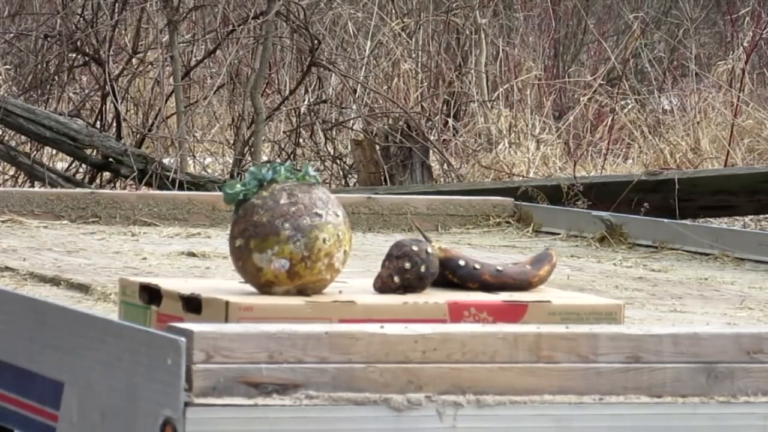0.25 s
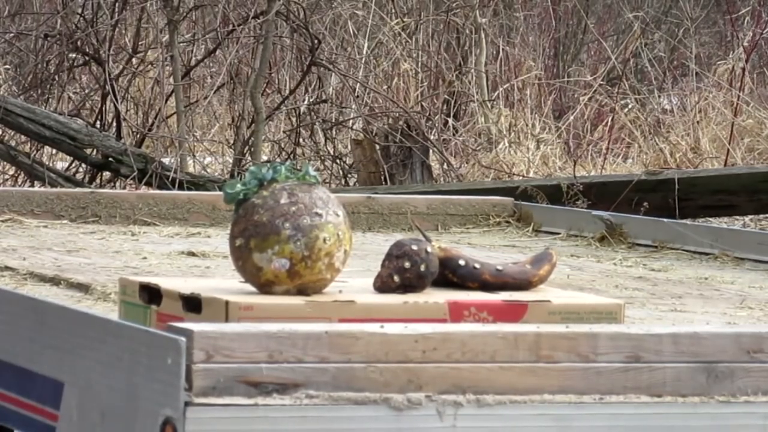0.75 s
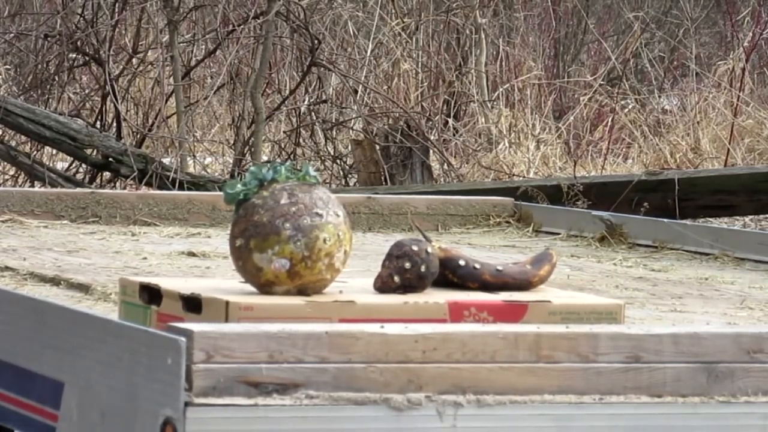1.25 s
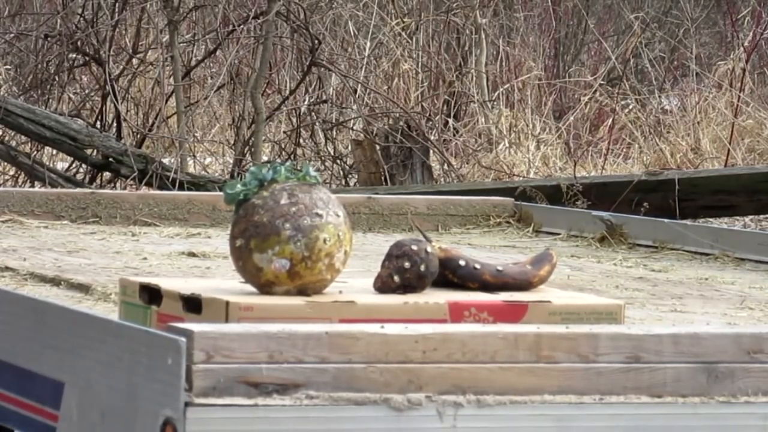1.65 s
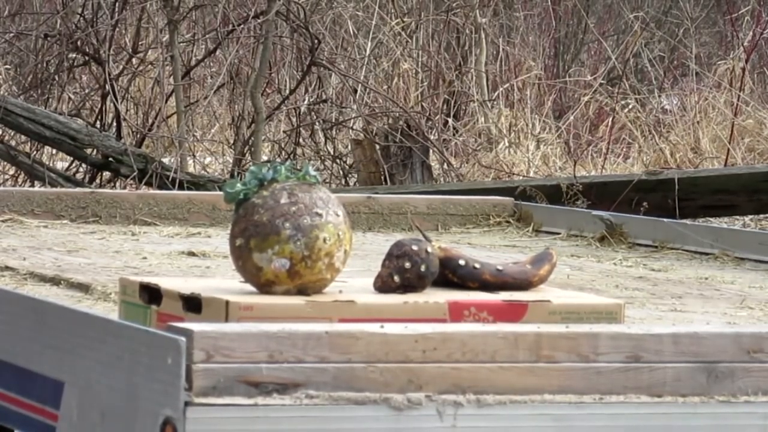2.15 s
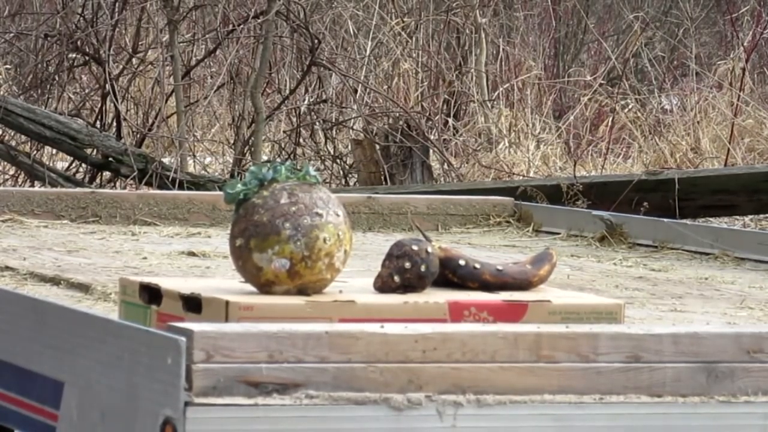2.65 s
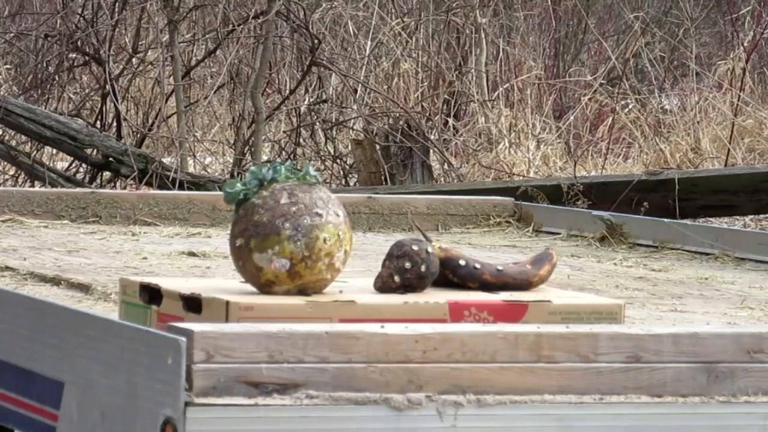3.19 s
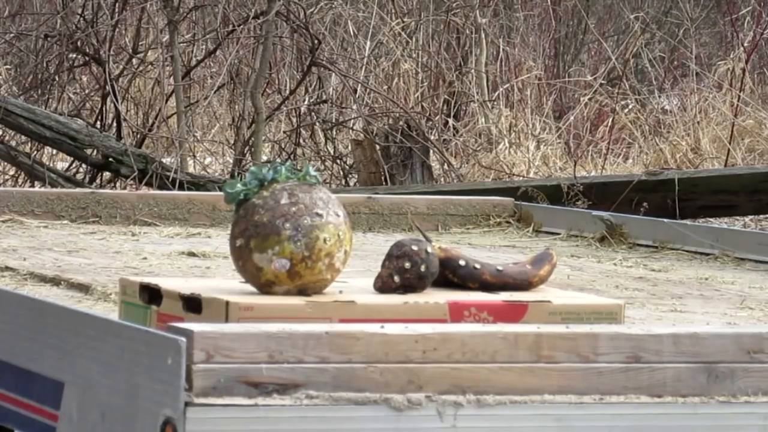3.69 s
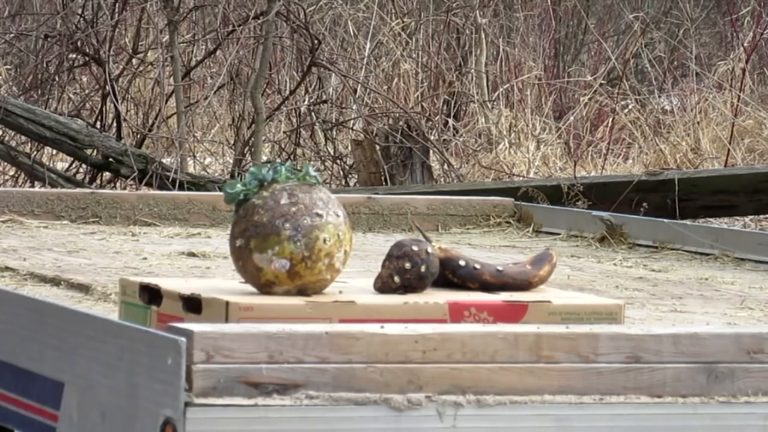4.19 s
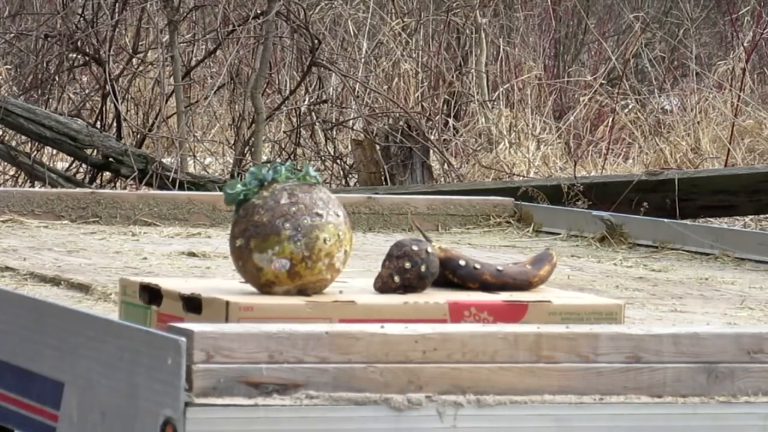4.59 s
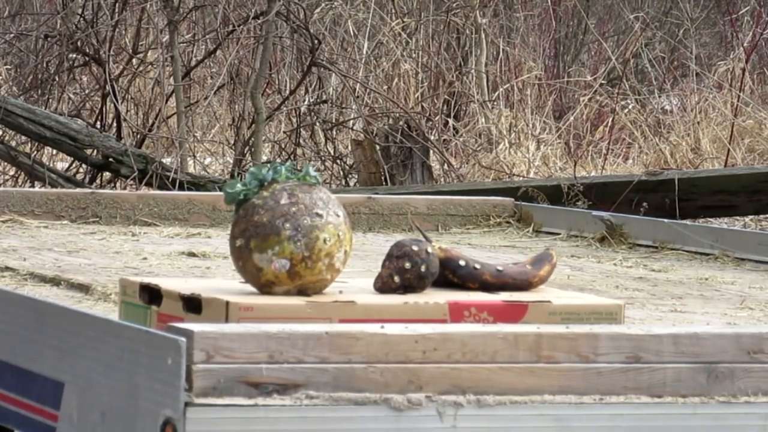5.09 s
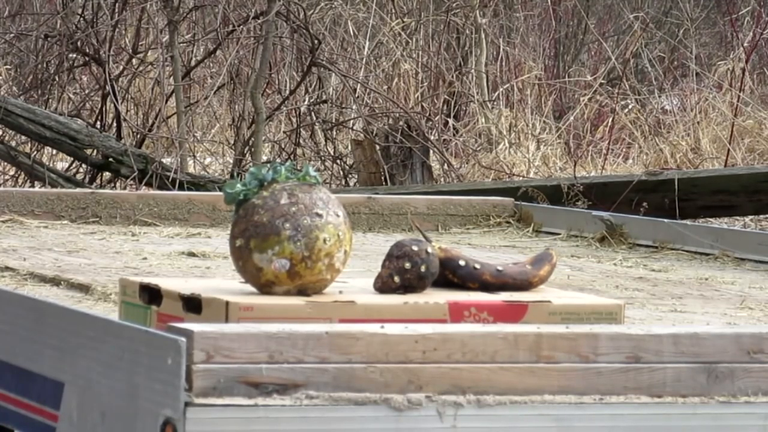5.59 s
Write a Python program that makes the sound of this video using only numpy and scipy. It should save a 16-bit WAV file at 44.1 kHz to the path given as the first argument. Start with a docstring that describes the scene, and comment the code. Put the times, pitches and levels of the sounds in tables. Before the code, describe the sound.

Wind thuds and rumbles on a microphone outdoors from the start, and an air pistol scrapes faintly in the hand. The first and loudest shot comes at about 0.3 seconds, a sharp crack with a puff of gas and a short reverberation from nearby trees. Two more follow at 1.5 and 2.4 seconds. Between them, gusts make low thumps, strongest around 1.1 and 2.3 seconds. From 3 seconds the pistol fires eight quicker, slightly quieter shots, evenly spaced a little under 0.4 seconds apart, the last at about 5.6 seconds. Every shot is followed by a faint dry tick of the pellet and, within a tenth of a second, the briefly ringing metallic snap of the action. The wind weakens during the quick run, leaving a soft, dull rush of open air.

```python
"""Gusts of wind thud on a microphone outdoors, as turbulent eddies carry swings of pressure past it.
An air pistol scrapes faintly in the hand, then fires eleven shots, three slowly and eight in quick
succession. Each is a push of expanding gas and a sharp crack, reflected by the ground, scattered by the
yard and trailed by reverberation from the edge of a wood. The pellet ticks downrange, then the action
snaps back and sets the gun's modes ringing."""
import sys
import numpy as np
from scipy import signal
from scipy.fft import rfft, irfft
from scipy.io import wavfile
from scipy.ndimage import uniform_filter1d

SR = 44100
rng = np.random.default_rng(int(sys.argv[2]) if len(sys.argv) > 2 else 0)


def waveform_to_disk(signal):
    """Save audio, clipped to [-1, 1], as 16-bit WAV at the path in sys.argv[1]."""
    frames = np.transpose(np.atleast_2d(signal))
    scaled = np.clip(frames, -1, 1) * 32767
    samples = np.round(scaled).astype(np.int16)
    wavfile.write(sys.argv[1], SR, samples)


N = 257749
T = np.arange(N) / SR
AGE = T[:SR // 2]  # seconds since the start of one short sound


def amp(db):
    """Amplitude grows tenfold for every 20 dB."""
    return 10 ** (np.asarray(db) / 20)


def unit(x):
    """Normalisation scales a signal to an energy of 1."""
    return x / np.sqrt(np.sum(x ** 2) + 1e-20)


def gains(spectrum, hz):
    """Interpolation on a log-frequency axis gives a spectrum's gain at any frequency."""
    points_hz, db = np.transpose(spectrum)
    return amp(np.interp(np.log(hz + 1), np.log(points_hz + 1), db))


def add(mix, start, sound):
    """Superposition: a sound adds to the mix from its start in seconds."""
    part = mix[max(round(start * SR), 0):][:len(sound)]
    part += sound[:len(part)]


def colour(x, spectrum, size=4096):
    """A minimum-phase filter shapes the spectrum and keeps attacks sharp; the result has energy 1."""
    log_gain = np.log(gains(spectrum, abs(np.fft.fftfreq(size, 1 / SR))))
    taps = np.fft.ifft(np.exp(signal.hilbert(log_gain).conj())).real
    return unit(signal.fftconvolve(x, taps[:size // 2])[:len(x)])


def decaying_noise(t60):
    """Exponential decay: noise of energy 1 falls by 60 dB in t60 seconds."""
    return unit(rng.standard_normal(len(AGE)) * amp(-60 * AGE / t60))


def burst(decay_s):
    """Repeated whitening and damping spread a brief turbulent burst evenly over all frequencies."""
    x = decaying_noise(decay_s)
    for _ in range(4):
        bins = rfft(x)
        x = irfft(bins / (abs(bins) + 1e-9), len(x)) * amp(-20 * AGE / decay_s)
    return unit(x)


def smooth(x, span):
    """Two moving averages suppress changes faster than span samples."""
    return uniform_filter1d(uniform_filter1d(x, span), span)


def steady_noise(spectrum, steady_s):
    """Division by its running rms holds coloured noise near rms 1 over spans longer than steady_s."""
    x = irfft(rfft(rng.standard_normal(N)) * gains(spectrum, np.fft.rfftfreq(N, 1 / SR)), N)
    return x / np.sqrt(abs(smooth(x ** 2, int(steady_s * SR))) + 1e-20)


def clumps(size, span_s, depth_db):
    """Random amplitude modulation: a gain that swells and sinks about once per span."""
    drift = smooth(rng.standard_normal(size), round(span_s * SR))
    return amp(depth_db * np.clip(drift / drift.std(), -2, 2))


# The level of the background air. Each row: time in seconds, relative level in dB.
BACKGROUND_LEVELS = [(0.0, -51.5), (0.19, -47), (0.39, -57.5), (1.4, -52), (1.69, -59.5), (2.42, -57.5),
                     (2.55, -60.5), (4.24, -68), (5.61, -64.5), (5.84, -63.5)]
def background_db():
    """A level envelope: it dips after each slow shot, swells back and stays low in the quick shots."""
    return np.interp(T, *np.transpose(BACKGROUND_LEVELS))


# Spectra of the far rush and the faint hiss. Each row: frequency in Hz, relative level in dB.
RUSH_SPECTRUM = [(40, 7.5), (400, 0), (800, 2.5), (1000, -1.5), (1350, -1.5), (2000, -12), (2600, -16.5),
                 (3300, -23), (5000, -25.5), (7500, -27.5), (11000, -32), (13000, -34), (15000, -44.5)]
HISS_SPECTRUM = [(1000, -2.5), (2800, 3.5), (4000, -2), (7200, 1.5), (9000, -5.5), (12000, -10.5),
                 (14000, -27.5)]
def open_air(rush_gain_db=6, hiss_db=-75):
    """Ambient noise: a far, dull rush dips and swells with the background level, over a steady hiss."""
    rush = amp(background_db() + rush_gain_db) * steady_noise(RUSH_SPECTRUM, steady_s=.3)
    return rush + amp(hiss_db) * steady_noise(HISS_SPECTRUM, steady_s=.3)


# Gusts at the microphone. Each row: peak time in seconds, length in seconds, relative rumble level
# in dB, relative flutter level in dB.
GUST_PEAKS = [(0.005, 0.14, -21.5, -18.5), (0.185, 0.08, -22.5, -39.5), (0.395, 0.062, -27, -28),
              (0.524, 0.1, -27.5, -36.5), (0.665, 0.1, -23, -31), (0.883, 0.16, -21, -37),
              (1.112, 0.16, -22.5, -19.5), (1.24, 0.13, -22.5, -27.5), (1.424, 0.082, -21, -40.5),
              (1.615, 0.052, -32.5, -27.5), (1.76, 0.13, -32, -29.5), (1.901, 0.088, -26.5, -24.5),
              (2.001, 0.14, -23.5, -29.5), (2.249, 0.14, -23.5, -26.5), (2.331, 0.094, -20, -16.5),
              (2.73, 0.043, -29.5, -44.5), (2.83, 0.026, -24.5, -42), (2.957, .09, -34, -42),
              (3.27, 0.11, -33, -32), (3.479, 0.049, -37.5, -39), (3.64, 0.14, -40.5, -52.5),
              (3.821, .06, -35.5, -37), (4.07, 0.086, -32, -37), (4.501, 0.091, -38.5, -42.5),
              (4.703, 0.055, -38, -38), (5.135, 0.077, -41.5, -47)]
def gust_levels(rumble_gain_db=11, flutter_gain_db=-4.5, edge_db=-10):
    """Incoherent sources add in power: background and gusts sum to rumble and flutter levels in dB."""
    background = amp(background_db()) * clumps(N, span_s=.045, depth_db=3.5)
    power = (amp([[rumble_gain_db], [flutter_gain_db]]) * background) ** 2
    for peak_s, length, rumble_db, flutter_db in GUST_PEAKS:
        near = abs(T - peak_s) < 2 * length
        shape_db = edge_db * (abs(T[near] - peak_s) / (length / 2)) ** 1.5
        power[:, near] += amp([rumble_db + shape_db, flutter_db + shape_db]) ** 2
    return 10 * np.log10(power)


# Spectra of the wind's three bands. Each row: frequency in Hz, relative level in dB.
RUMBLE_SPECTRUM = [(8, -16), (25, 0), (45, 1.5), (75, 2), (125, -2), (170, -8.5), (260, -30.5),
                   (1000, -77.5)]
FLUTTER_SPECTRUM = [(80, -21), (160, 5), (230, 1.5), (330, -14.5), (500, -24.5), (1000, -57), (3000, -74)]
ROAR_SPECTRUM = [(150, -21.5), (300, 9), (420, 7), (600, -5), (900, -15), (1500, -43.5), (4000, -76)]
def wind(rumble_db, flutter_db):
    """Turbulent pressure buffets the microphone in puffs; only hard gusts reach up into a roar."""
    puffs = clumps(N, span_s=.016, depth_db=3)
    rumble = amp(rumble_db - 2) * steady_noise(RUMBLE_SPECTRUM, steady_s=.077)
    flutter = amp(flutter_db - 4.5) * steady_noise(FLUTTER_SPECTRUM, steady_s=.016)
    roar_db = flutter_db - 10 + .86 * (flutter_db + 20)
    roar = amp(roar_db) * steady_noise(ROAR_SPECTRUM, steady_s=.039)
    return np.sqrt(puffs) * rumble + puffs * (flutter + roar)


def eddy_pulse(t, hz):
    """A vortex passing at t = 0 swings the pressure up, then down; its spectrum peaks at hz."""
    phase = 2 * np.pi * hz * t
    return -phase * np.exp((1 - phase ** 2) / 2)


def small_eddies(flutter_db, lowest_hz=150, octaves=.82, count=150):
    """The flow carries random eddies past, as strong as their gust; smaller ones are higher and weaker."""
    out = np.zeros(N)
    t = AGE[:SR // 25] - .02
    for when, smallness, strength in rng.random((count, 3)):
        hz = lowest_hz * 2 ** (octaves * smallness)
        peak = 2 * strength * amp(flutter_db[int(when * N)] + 3) * 2 ** -smallness
        add(out, when * N / SR + t[0], peak * eddy_pulse(t, hz))
    return out


# Single eddies at the microphone. Each row: time in seconds, relative peak in dB, frequency in Hz.
EDDY_THUDS = [(0.035, -9.5, 172), (.084, -9.5, 136), (0.184, -15, 121), (0.88, -16, 83.3),
              (1.051, -11.5, 231), (1.088, -7, 227), (1.109, -3.5, 116.8), (1.178, -11.5, 175),
              (1.305, -14, 150), (1.41, -25, 114), (2.037, -19, 157), (2.221, -10.5, 142.8),
              (2.315, -11, 264), (2.35, -9, 180), (2.836, -22, 196), (2.948, -22, 135), (3.28, -17.5, 150)]
def thuds():
    """Each eddy's pressure swing is a thud; strong, fast ones break into a short turbulent roar."""
    out = np.zeros(N)
    for centre_s, db, hz in EDDY_THUDS:
        add(out, centre_s - .02, amp(db - 1) * eddy_pulse(AGE - .02, hz))
        roughness = amp(13 + 1.6 * db) * (hz / 190) ** 2
        add(out, centre_s - .002, roughness * colour(decaying_noise(t60=.045), ROAR_SPECTRUM))
    return out


# Scrapes on the gun. Each row: peak time in seconds, level in dB, rise and fall constant in seconds.
HAND_SCRAPES = [(0.074, -27, 0.0011), (0.132, -15, 0.0086), (0.206, -24, 0.0027), (0.715, -22.5, 0.0038)]
# Their spectrum. Each row: frequency in Hz, relative level in dB.
SCRAPE_SPECTRUM = [(300, -13), (1800, 11.5), (3500, 2.5), (6000, -1), (9000, -22), (15000, -27.5)]
def handling(lead_s=.03):
    """Friction makes short, soft swells of noise as the gun is handled."""
    out = np.zeros(N)
    for peak_s, db, fade_s in HAND_SCRAPES:
        rub = rng.standard_normal(len(AGE)) * np.exp(-abs(AGE - lead_s) / fade_s)
        add(out, peak_s - lead_s, amp(db) * colour(rub, SCRAPE_SPECTRUM))
    return out


# The spectrum of the muzzle crack. Each row: frequency in Hz, relative level in dB.
CRACK_SPECTRUM = [(200, -28), (1000, -20.5), (1500, -7.5), (2000, 0.5), (2700, -9), (4200, -11), (5500, -6),
                  (6800, -1), (8000, -4.5), (11000, -2), (12500, -10.5), (14500, -22.5), (16000, -40.5)]
def shot_spectrum(tilt_db, bark_db, bark_hz=1950):
    """Spectral tilt brightens or dulls a crack; barrel resonance gives it more or less hollow bark."""
    hz, db = np.transpose(CRACK_SPECTRUM)
    octaves = np.log2(hz / bark_hz)
    return np.c_[hz, db + tilt_db * octaves + bark_db * np.exp(-(octaves / .5) ** 2)]


# The gun's modes of vibration. Each row: frequency in Hz, relative level in dB.
GUN_MODES = [(1700, -3.5), (2030, -2.5), (2840, 2), (3760, -7.5), (4750, -2), (5500, -13.5), (6215, 5.5),
             (6720, -6.5), (7050, -6.5), (7420, -6.5), (8390, -7.5), (8840, -7.5), (9130, -6.5),
             (10350, -9), (10620, -14), (10950, -9), (11850, -10)]
def gun_ring(t60=.041, spread_db=1.6):
    """Damped normal modes ring briefly, excited a little differently by every blow."""
    hz, db = np.transpose(GUN_MODES)[:, :, None]
    envelope_db = db + spread_db * rng.standard_normal(hz.shape) - 60 * (AGE / t60) ** 1.35
    modes = amp(envelope_db) * np.sin(2 * np.pi * (hz * AGE + rng.random(hz.shape)))
    return unit(modes.sum(0))


# The shots. Each row: start in seconds, push level in dB, crack level in dB, tilt in dB per octave,
# bark in dB.
PISTOL_SHOTS = [(0.256, 12.5, 14, 1, -3.5), (1.4861, 10, 11, -2.5, -8), (2.4485, 7.5, 8.5, -0.5, -5.5),
                (3.0052, 4, 8.5, 2, 3.5), (3.397, 3, 8.5, 1, -2), (3.7427, -1, 5, 1.5, -4.5),
                (4.1255, -1.5, 5, 3.5, 4.5), (4.5075, -1.5, 3.5, -2, -6), (4.878, -1.3, 3.5, 2.5, -1.5),
                (5.2629, -1.5, 3, 2, 2.5), (5.6457, -0.5, 4, 3, 9.5)]
# Spectra of the gas push and the scattered sound. Each row: frequency in Hz, relative level in dB.
PUSH_SPECTRUM = [(30, -23), (100, -1), (250, 2), (480, 4), (820, 1.5), (1020, -14.5), (1500, -19.5),
                 (4000, -18.5), (16000, -75)]
SCATTER_SPECTRUM = [(60, -5.5), (250, -5), (800, 4.5), (1250, 0.5), (2100, -4), (3400, -8), (5200, -1),
                    (7000, -3.5), (11000, 0), (13000, -5.5), (15000, -15.5)]
# Reflecting surfaces. Each row: delay in seconds, push gain in dB, crack gain in dB, nominal decay
# time of the smeared crack in seconds.
REFLECTORS = [(.0059, -23, -17.5, 0.0026), (.0092, -24.5, -26, 0.0051), (0.019, -34.5, -17.5, 0.026),
              (.023, -32.5, -17.5, 0.028), (.0345, -23, -40, .008), (.054, -31.5, -27, 0.028),
              (0.14, -60, -46.5, 0.11)]
def shots(crack_s=.00056, ground_s=.00356, near_s=.00232, scatter_s=.0037):
    """Gas expands from the muzzle with a push and a crack; reflection and scattering return both."""
    out = np.zeros(N)
    yard = decaying_noise(t60=.13)
    push = colour(signal.unit_impulse(len(AGE)), PUSH_SPECTRUM)
    smears = [colour(burst(decay_s), CRACK_SPECTRUM) for *_, decay_s in REFLECTORS]
    for start, push_db, crack_db, tilt_db, bark_db in PISTOL_SHOTS:
        spectrum = shot_spectrum(tilt_db, bark_db)
        direct = amp(push_db) * push
        add(direct, crack_s, amp(crack_db) * colour(burst(decay_s=.003), spectrum))
        add(out, start, direct)
        ground_echo = amp(-2.6 - .89 * crack_db) * direct
        add(out, start + ground_s, ground_echo)
        near_echo = amp(-8.5 + 1.45 * crack_db) * colour(burst(decay_s=.0006), spectrum)
        add(out, start + crack_s + near_s, near_echo)
        for (delay, push_gain_db, crack_gain_db, _), smear in zip(REFLECTORS, smears):
            echo = amp(push_db + push_gain_db) * push + amp(crack_db + crack_gain_db) * smear
            add(out, start + delay, echo)
        # small surfaces scatter the shot in uneven clumps, partly the same each time
        scatter = yard + decaying_noise(t60=.1) + decaying_noise(t60=.025)
        scatter *= clumps(len(AGE), span_s=.001, depth_db=2.2)
        tail = colour(scatter, SCATTER_SPECTRUM) + amp(-12) * gun_ring()
        add(out, start + scatter_s, amp(-1.8 + .48 * crack_db) * tail)
    return out


# Reverberation at the edge of the wood. Each row: frequency in Hz, time to fall 60 dB in seconds.
WOOD_DECAY = [(300, 0.2), (1500, 0.47), (2900, .58), (6000, 0.23), (10000, 0.31), (15000, 0.2)]
def wood_reverberation(sound, wet_db=-22, rise_s=.011):
    """Multiple scattering among trees returns a diffuse tail that lasts longest near 3 kHz."""
    hz, t, bins = signal.stft(rng.standard_normal(len(AGE)), SR, nperseg=256)
    t60 = np.interp(hz, *np.transpose(WOOD_DECAY))[:, None]
    tail = signal.istft(bins * amp(-60 * t / t60), SR, nperseg=256)[1][:len(AGE)]
    tail *= 1 - np.exp(-AGE / rise_s)
    return signal.fftconvolve(sound, amp(wet_db) * unit(tail))[:N]


def pellets(level_db=-16, flight_s=.0321, growth_s_per_s=.00186):
    """Each pellet's impact is a dry tick; the time of flight grows as the gas runs down."""
    out = np.zeros(N)
    for start, *_ in PISTOL_SHOTS:
        tick = amp(level_db) * colour(burst(decay_s=.003), SCATTER_SPECTRUM)
        add(out, start + flight_s + growth_s_per_s * start, tick)
    return out


# The action snapping back. Each row: start in seconds, level in dB.
ACTION_SNAPS = [(0.3429, 1), (1.584, -1.5), (2.5466, -2.5), (3.0791, -6), (3.4719, -5), (3.813, -6),
                (4.1938, -8.5), (4.5762, -7), (4.9454, -9), (5.332, -8), (5.703, -5.5)]
# The spectrum of its clatter. Each row: frequency in Hz, relative level in dB.
CLATTER_SPECTRUM = [(100, -28), (700, -4.5), (1800, -0.5), (2500, -7.5), (3500, -9.5), (5000, -2),
                    (6500, 6.5), (8000, -4), (11000, -1.5), (12500, -10), (15000, -17.5)]
def action(chatter_t60=.054):
    """Impact excitation: the action hits its stop, chatters briefly and rings the gun."""
    clatter, ringing = np.zeros((2, N))
    for start, db in ACTION_SNAPS:
        chatter = rng.standard_normal(len(AGE)) * amp(-60 * (AGE / chatter_t60) ** 1.2)
        add(clatter, start, amp(db) * colour(chatter, CLATTER_SPECTRUM))
        add(ringing, start, amp(db) * gun_ring())
    return clatter, ringing


def scene():
    """Gun, reverberation, wind and open air superpose; little of the action's ringing reaches the trees."""
    clatter, ringing = action()
    gun = shots() + pellets() + clatter + handling()
    rumble_db, flutter_db = gust_levels()
    reverberation = wood_reverberation(gun + .3 * ringing)
    buffeting = wind(rumble_db, flutter_db) + small_eddies(flutter_db) + thuds()
    return (gun + ringing + reverberation + buffeting + open_air())[None]


def record(dry, cutoff_hz=15200):
    """Overload clips the loudest cracks, and a low-pass filter limits the bandwidth."""
    clipped = np.clip(dry, -1, 1)
    lowpass = signal.firwin(191, cutoff_hz, window=("kaiser", 8), fs=SR)
    return signal.oaconvolve(clipped, lowpass[None], "same")


dry = scene()
out = record(dry)
waveform_to_disk(out)
```